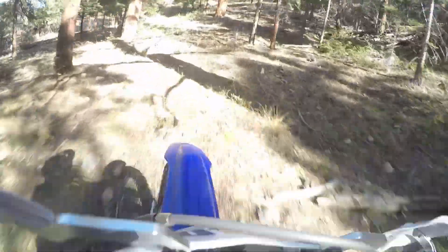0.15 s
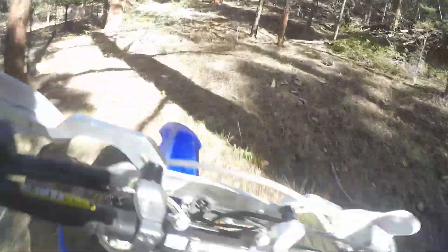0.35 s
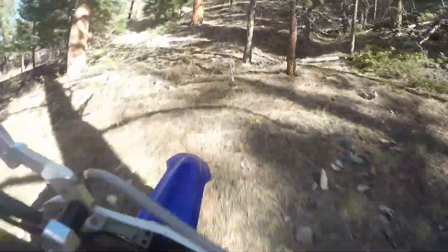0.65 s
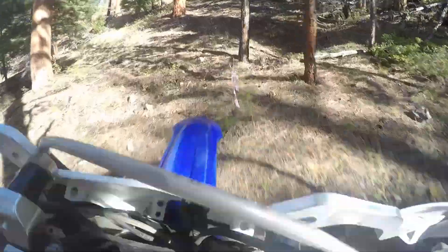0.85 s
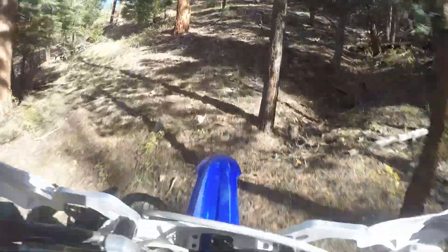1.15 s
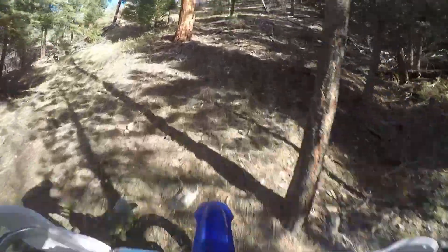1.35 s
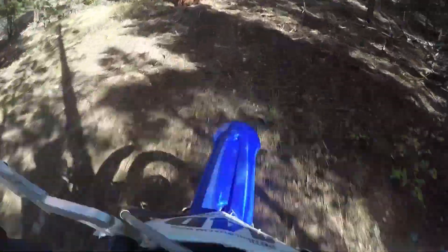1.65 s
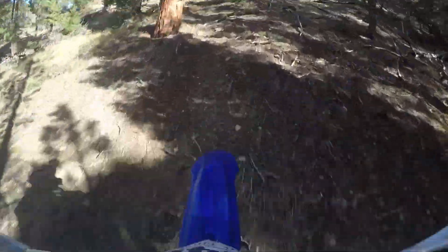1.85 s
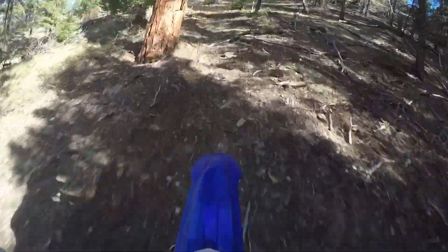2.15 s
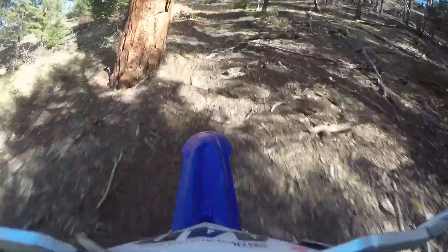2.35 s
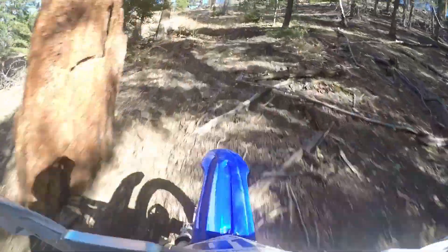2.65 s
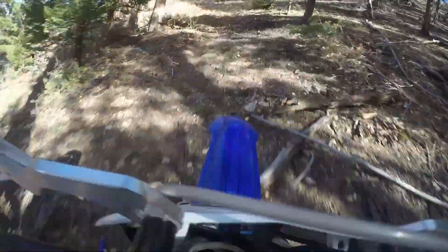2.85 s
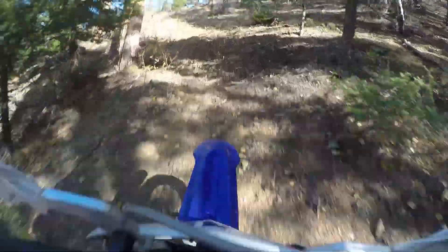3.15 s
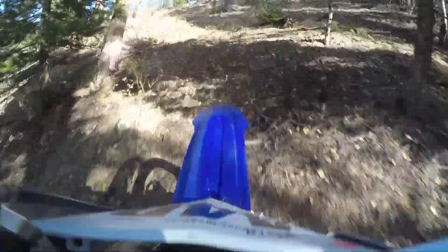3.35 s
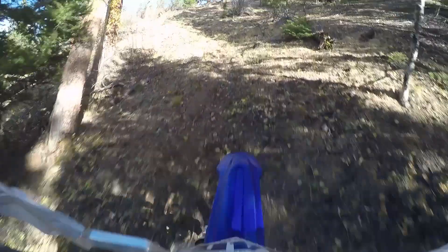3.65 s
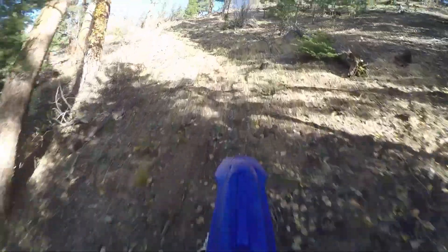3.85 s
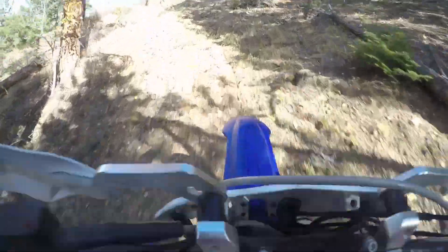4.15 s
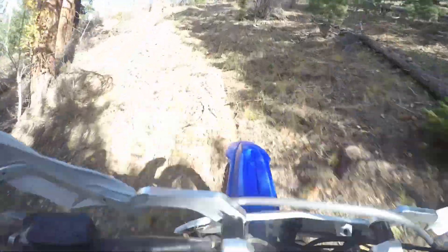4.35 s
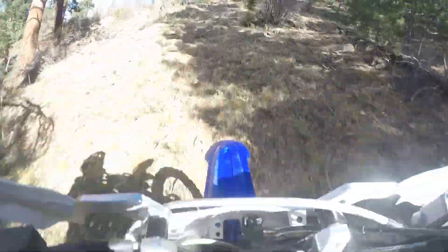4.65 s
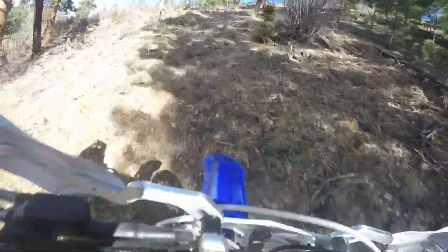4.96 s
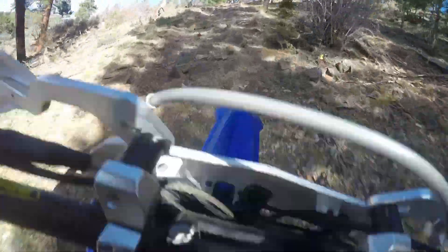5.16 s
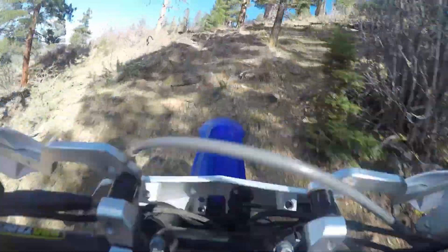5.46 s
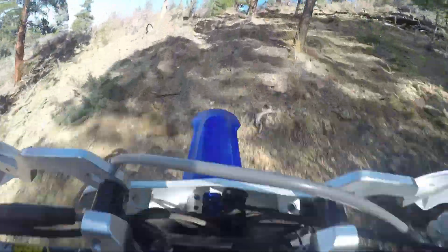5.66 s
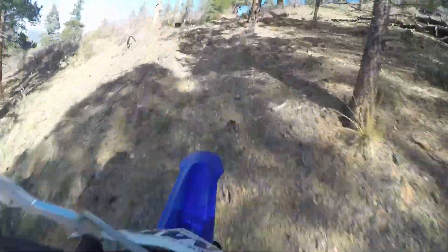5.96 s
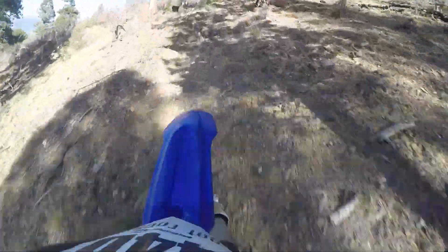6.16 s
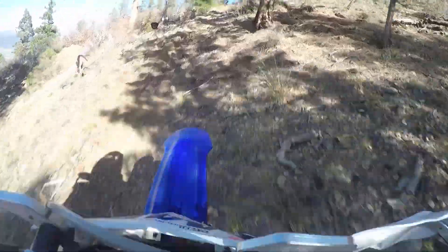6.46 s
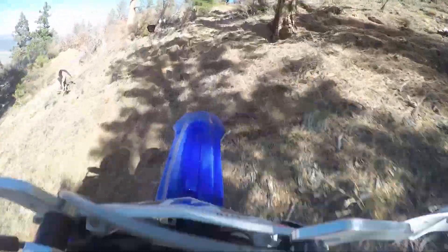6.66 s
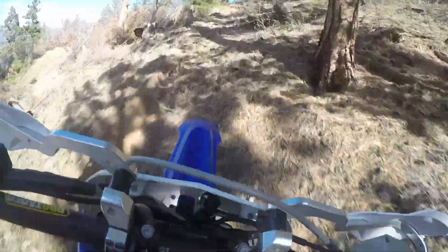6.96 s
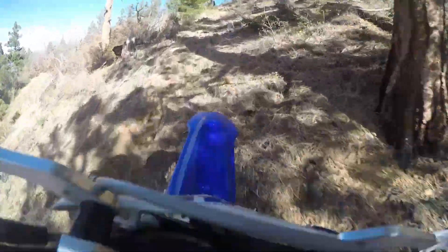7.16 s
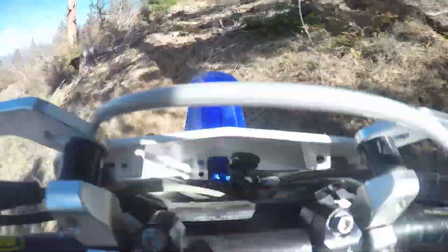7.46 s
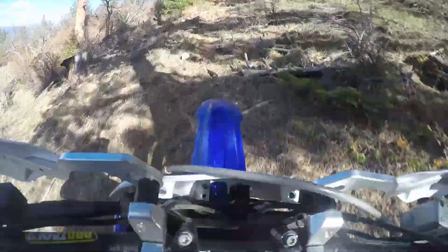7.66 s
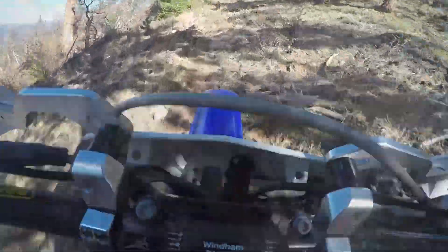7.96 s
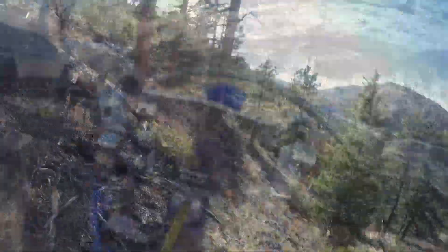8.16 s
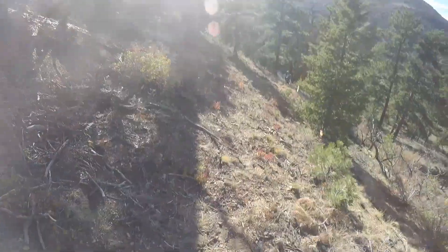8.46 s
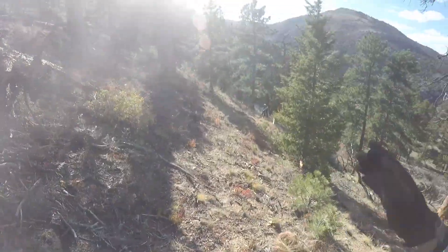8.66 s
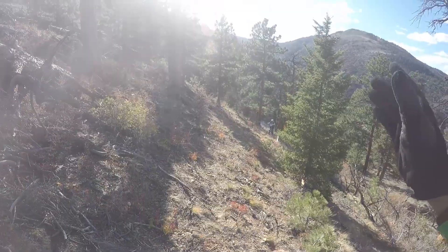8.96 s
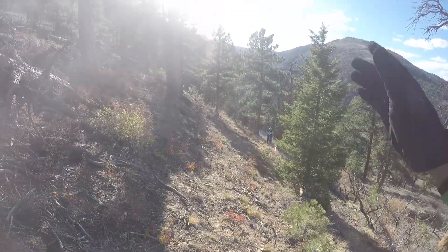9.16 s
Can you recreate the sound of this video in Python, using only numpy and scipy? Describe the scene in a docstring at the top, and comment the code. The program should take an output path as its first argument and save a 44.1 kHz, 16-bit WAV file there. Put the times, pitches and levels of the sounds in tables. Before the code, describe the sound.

A two-stroke dirt bike climbs a loose forest slope, heard from a microphone on the rider. The engine revs unevenly up and down with a rattling, hissy edge over low wind rumble and a few grit ticks. A stone strikes with one loud crack, and the engine pushes to its highest revs before easing. The ride fades into a soft breeze in the trees, with a dull thump, light clicks and a faint distant bike.

```python
"""Dirt bike on a forest slope

A two-stroke bike climbs loose ground, heard from a camera strapped to the rider. Each firing pushes
a low note out of the exhaust, shakes the panels and cylinder, and adds a puff of hiss. Wind rumbles,
grit ticks and a stone strikes. The ride fades out and a quiet hillside fades in, with knocks on the
camera housing, its swaying mount and a far bike coming nearer."""
import sys
import numpy as np
from scipy import signal
from scipy.fft import rfft, irfft, next_fast_len
from scipy.io import wavfile
from scipy.ndimage import uniform_filter1d

SR = 44100
rng = np.random.default_rng(int(sys.argv[2]) if len(sys.argv) > 2 else 0)


def dump(signal):
    """Clip the signal to [-1, 1] and save it as 16-bit WAV at the path in sys.argv[1]."""
    limited = np.clip(np.atleast_2d(signal).T, -1, 1)
    pcm = np.round(limited * 32767).astype(np.int16)
    wavfile.write(sys.argv[1], SR, pcm)


N = 410130
TIME = np.arange(N) / SR
HIT_TIME = TIME[:8000]  # the short clock of one knock or thump


def gain_of(db):
    """Turns decibels into a number to multiply a sound by."""
    return 10 ** (np.asarray(db) / 20)


def evened(x):
    """Scales a signal to an average size (rms) of 1."""
    return x / np.sqrt(np.mean(x ** 2) + 1e-20)


def curves(rows):
    """Joins a table's points into lines over time; adds a gate that is open from first row to last."""
    times, *columns = np.transpose(rows)
    gate = uniform_filter1d(1. * (TIME >= times[0]) * (TIME <= times[-1]), size=400)
    return [np.interp(TIME, times, column) for column in columns] + [gate]


def add(mix, start_s, sound):
    """Mixes a short sound in at its start time."""
    part = mix[round(start_s * SR):][:len(sound)]
    part += sound[:len(part)]


def coloured(x, points):
    """Makes some pitches louder and others softer, like a tone control."""
    pitches, db = np.transpose(points)
    size = next_fast_len(N)
    hz = np.fft.rfftfreq(size, 1 / SR)
    shape = gain_of(np.interp(np.log(hz + 1), np.log(pitches + 1), db))
    return evened(irfft(rfft(x, size) * shape, size)[:N])


def ringing(x, notes):
    """An object shaken by x rings at its own notes; narrower notes ring longer."""
    out = np.zeros(N)
    for k, (hz, width, db) in enumerate(notes):
        decay = np.exp(-np.pi * width / SR)
        pole = decay * np.exp(2j * np.pi * hz / SR)
        out += (-1) ** k * gain_of(db) * signal.lfilter([1 - decay], [1, -pole], x).real
    return evened(out)


def drift(rate_hz):
    """A smooth random wobble; a higher rate wobbles faster."""
    smooth = signal.butter(2, rate_hz, fs=SR, output="sos")
    return evened(signal.sosfilt(smooth, rng.standard_normal(N)))


# Exhaust loudness (time [s], level of harmonic 1 [dB], level of the rest together [dB])
EXHAUST_LEVELS = [(0.0, -13, -30.5), (0.08, -11, -32), (0.13, -14.5, -44), (0.19, -15, -38),
                  (0.26, -34, -33), (0.28, -20, -16.5), (0.43, -16, -17), (0.58, -14, -23.5),
                  (0.71, -16.5, -13), (1.45, -16, -12), (1.49, -24.5, -12), (1.69, -17, -17),
                  (1.83, -18, -11.5), (1.88, -28, -11.5), (1.99, -18, -13.5), (2.1, -19.5, -12.5),
                  (2.83, -17, -13), (2.98, -14, -22.5), (3.05, -16, -16.5), (3.2, -19, -14),
                  (3.67, -18, -17.5), (3.91, -34, -15.5), (3.98, -23, -13.5), (4.13, -15, -17),
                  (4.88, -21.5, -15.5), (4.95, -33, -15), (5.01, -13, -14), (5.1, -27, -14),
                  (5.3, -16, -18.5), (5.38, -17, -22), (5.62, -17, -13), (5.75, -14.5, -21.5),
                  (5.88, -12.5, -31.5), (5.92, -18, -35), (5.97, -17.5, -19.5), (6.16, -16, -16.5),
                  (6.35, -13.5, -28.5), (6.65, -13.5, -17), (6.68, -12.5, -24.5), (7.28, -12.5, -18),
                  (7.37, -15.5, -21.5), (7.5, -17.5, -14.5), (7.63, -15, -15.5), (7.76, -16.5, -13)]
# How the pipe favours harmonics 2 to 4 (pitch [Hz], level [dB])
PIPE_TONE = [(140, -21), (170, -13.5), (200, -8.5), (240, -2.5), (285, 2), (320, 2), (360, -9), (400, -19),
             (450, -16.5), (500, -17.5)]
# The same for harmonics 5 to 10 (pitch [Hz], level [dB])
UPPER_TONE = [(300, 4), (400, 1.5), (480, -1), (540, -8), (620, -17.5), (800, -24.5), (900, -35.5)]


def exhaust(firing_hz, turns):
    """The pipe's low note: ten harmonics, which are tones at 1, 2, 3... times the firing rate."""
    first_db, rest_db, _ = curves(EXHAUST_LEVELS)
    contrast = np.clip(2 + .44 * (rest_db + 16), .3, 1)  # the pipe's peak flattens when it is quiet
    shares_db = []
    for k, trim_db in [(2, 3), (3, .5), (4, 2)]:
        db = contrast * np.interp(k * firing_hz, *np.transpose(PIPE_TONE)) + trim_db
        waver_db = 5.5 * np.clip(-db / 10, 0, 1)  # harmonics off the pipe's peak come and go
        shares_db.append(db + waver_db * drift(rate_hz=6.2))
    shares_db += [np.interp(k * firing_hz, *np.transpose(UPPER_TONE)) - 12.5 for k in range(5, 11)]
    total_db = 10 * np.log10(sum(gain_of(db) ** 2 for db in shares_db))
    levels_db = [first_db] + [rest_db + db - total_db for db in shares_db]
    chamber_hz, width_hz = 400, 250  # the exhaust chamber delays harmonics near its own note
    out = np.zeros(N)
    for k, db in enumerate(levels_db, 1):
        lag = np.arctan2(k * firing_hz * width_hz, chamber_hz ** 2 - (k * firing_hz) ** 2)
        if k == 1:  # the frame carries the lowest tone late at low speed
            lag += np.clip((95 - firing_hz) / 24, 0, .7)
        out -= np.sqrt(2) * gain_of(db + 1.27 * drift(rate_hz=17)) * np.cos(2 * np.pi * k * turns - lag)
    return out


# Firing, port opening, reed valve closing and piston slap (place in the turn [0 to 1], level [dB])
BLOWS_PER_TURN = [(0, 0), (.19, -6), (.41, -5), (.70, -8)]


def engine_blows(turns):
    """Four clicks in each turn of the engine, a little uneven in time and strength."""
    out = np.zeros(N)
    for place, db in BLOWS_PER_TURN:
        strength, jitter = rng.standard_normal((1200, 2))[(turns - place + 1.5).astype(int)].T
        uneven_turns = turns - place + .002 * jitter + .012 * place * drift(rate_hz=4)
        clicks = np.diff(np.floor(uneven_turns), prepend=0).clip(0)
        out += clicks * gain_of(db + 1.5 * strength + 1.5 * drift(rate_hz=6))
    return evened(out)


# Notes of the body panels (pitch [Hz], width [Hz], level [dB])
PANEL_NOTES = [(620, 960, -14.5), (864, 155, -3), (961, 80, 3.5), (1067, 181, -2.5), (1248, 98, -4),
               (1405, 117, -2.5), (1614, 143, -3.5), (2110, 366, -7)]


def panel_rattle(blows, puffs, chatter):
    """Blows, puffs and loose parts shake the panels."""
    return ringing(1.3 * blows + puffs + .3 * chatter, PANEL_NOTES)


# Broad notes of the cylinder (pitch [Hz], width [Hz], level [dB])
CYLINDER_NOTES = [(2300, 230, -4.5), (2541, 110, -3.5), (2727, 64, 0), (2989, 254, 3), (3219, 233, -0.5),
                  (3485, 146, -4), (3716, 123, -5.5)]
# Sharp notes heard when the engine works hard (pitch [Hz], width [Hz], level [dB])
HARD_WORK_NOTES = [(1597, 30, -5), (2568, 28, -7), (3015, 24, 1), (3175, 20, -3), (3590, 30, -5)]
# Notes that sing out at top speed (pitch [Hz], width [Hz], level [dB])
TOP_SPEED_NOTES = [(3015, 16, 0), (3175, 16, -9), (1597, 24, -14)]


def cylinder_ring(blows, puffs, chatter, ring_db, firing_hz):
    """The struck cylinder rings, with sharper notes when the engine works hard or runs fast."""
    shaking = 1.5 * blows + puffs
    ring = ringing(shaking + .3 * chatter, CYLINDER_NOTES)
    work_db = .7 * np.minimum(ring_db + 21, 0) - 1.5
    ring += gain_of(work_db) * ringing(shaking, HARD_WORK_NOTES)
    sing_db = -25.5 - (120 - firing_hz).clip(0)  # 1 dB softer for each Hz below 120
    return gain_of(ring_db) * ring + gain_of(sing_db) * ringing(blows + puffs, TOP_SPEED_NOTES)


# Tone of the air being sucked in (pitch [Hz], level [dB])
INTAKE_TONE = [(2240, -31.5), (3800, 0), (4250, -5.5), (6090, -3.5), (6810, -8.5), (7430, -10), (8500, -20),
               (11000, -52.5), (18700, -120)]
# Notes of the cooling fins (pitch [Hz], width [Hz], level [dB])
FIN_NOTES = [(4790, 60, 0), (5450, 60, -1), (5920, 30, 2), (6720, 45, -6), (7160, 40, -3)]


def intake_hiss(blows, puffs, chatter):
    """Air hisses into the engine in puffs while the fins ring faintly."""
    intake = puffs + .32 * chatter
    return evened(coloured(intake, INTAKE_TONE) + .32 * ringing(intake + blows, FIN_NOTES))


# Tone of the highest hiss (pitch [Hz], level [dB])
FIZZ_TONE = [(4710, -38.5), (8000, -3.5), (9150, -11), (10400, -2), (12500, -8), (14700, -17.5),
             (15400, -20)]


def fizz(puffs, chatter):
    """Puffs and loose parts add a thin, flickering sizzle."""
    return gain_of(.5 * drift(rate_hz=11)) * coloured(puffs + .26 * chatter, FIZZ_TONE)


# Engine speed, one firing per turn (time [s], firing rate [Hz])
ENGINE_SPEED = [(0, 103.1), (.09, 99.5), (.16, 96.6), (.27, 70.5), (.39, 71.8), (.48, 78.4), (.61, 84.56),
                (.68, 77.2), (.75, 84.3), (.89, 73.25), (1.07, 71.1), (1.11, 75.4), (1.16, 70.8),
                (1.23, 72.56), (1.31, 82), (1.37, 83), (1.43, 95.7), (1.52, 88.1), (1.57, 96.7), (1.66, 72),
                (1.73, 75.3), (1.77, 71.4), (1.84, 87.9), (1.91, 84.8), (1.98, 94.65), (2.18, 99.1),
                (2.25, 96.6), (2.52, 92.85), (2.66, 103.9), (2.89, 105.6), (2.98, 95.9), (3.05, 93.8),
                (3.14, 92.26), (3.22, 104.6), (3.3, 96.3), (3.39, 98), (3.48, 90.5), (3.57, 94.4),
                (3.71, 109.7), (3.93, 114.9), (4.07, 108.7), (4.12, 102.9), (4.23, 104.1), (4.32, 107.3),
                (4.43, 114.9), (4.64, 110.2), (4.71, 113.9), (4.8, 112.4), (4.87, 124), (4.92, 116.8),
                (5.03, 121.9), (5.16, 120.2), (5.28, 105.8), (5.35, 91.1), (5.48, 89.6), (5.53, 97.3),
                (5.6, 93.1), (5.69, 102.3), (5.8, 105.4), (5.94, 87.75), (5.98, 94.5), (6.08, 92.85),
                (6.19, 98.05), (6.39, 90.4), (6.46, 93.3), (6.51, 88.2), (6.58, 94.64), (6.85, 84.9),
                (7.03, 86.7), (7.08, 90.42), (7.12, 85.4), (7.19, 91.45), (7.23, 88.5), (7.33, 92.8),
                (7.51, 79.5), (7.6, 77.1), (7.85, 93.8), (8.15, 90.3)]
# Two lists, before and after the stone strike (time [s], mids level [dB], treble level [dB])
MIDS_AND_TREBLE = [
    [(0.03, -27, -34), (0.19, -30, -39.5), (0.24, -34, -45), (0.67, -23, -35), (1.04, -26, -38.5),
     (1.56, -26, -35), (1.6, -22, -36), (1.66, -29.5, -43), (1.85, -22, -35), (1.91, -24.5, -39),
     (2.1, -24.5, -34), (2.16, -26.5, -37), (2.2, -22, -28.5), (2.23, -25, -33.5), (2.53, -25, -36.5),
     (2.73, -24.5, -31.5), (2.76, -23.5, -31), (2.88, -24, -28.5), (3.03, -25, -35), (3.4, -23.5, -33.5)],
    [(3.48, -29, -44), (3.66, -30.5, -40), (4.0, -24.5, -26), (4.3, -25, -28), (4.33, -22.5, -31),
     (4.58, -23, -27.5), (5.29, -25, -28), (5.45, -24, -31.5), (5.49, -25.5, -39.5), (5.86, -25.5, -30.5),
     (5.88, -29.5, -35.5), (6.13, -23, -34.5), (6.28, -29, -32), (6.65, -22.5, -32.5), (6.73, -22.5, -35),
     (7.14, -22, -33), (7.16, -21.5, -29.5), (7.6, -22, -38), (7.62, -20, -35.5), (7.76, -22, -33)],
]
# How ring, hiss and fizz follow the treble
# (level at usual treble [dB], rise per dB of treble [dB], boost at full throttle [dB])
TREBLE_LAYERS = [(-27, 0.67, 0.5), (-33.5, 1.06, 0.5), (-50, 1.0, 7)]
USUAL_TREBLE_DB, FULL_THROTTLE_S, OPENING_S = -34, (3.78, 5.47), .04


def engine():
    """The turning engine drives the exhaust note and the blows and puffs behind its rattle and hiss."""
    firing_hz, _ = curves(ENGINE_SPEED)
    mids_db, treble_db, _ = curves(np.vstack(MIDS_AND_TREBLE))
    opens_s, closes_s = FULL_THROTTLE_S
    full_throttle = np.clip(np.minimum(TIME - opens_s, closes_s - TIME) / OPENING_S, 0, 1)
    ring_db, hiss_db, fizz_db = [db + rise * (treble_db - USUAL_TREBLE_DB) + boost_db * full_throttle
                                 for db, rise, boost_db in TREBLE_LAYERS]
    turns = np.cumsum(firing_hz * (1 + .006 * drift(rate_hz=14))) / SR
    low_note = exhaust(firing_hz, turns)
    strength = gain_of(2.5 * rng.standard_normal(1200))[turns.astype(int)]  # each firing differs
    blows = engine_blows(turns)
    pulse = strength * np.exp(-((turns + .4) % 1) / .5)
    panel_puffs, ring_puffs, hiss_puffs, fizz_puffs = [
        evened((steady + pulse) * rng.standard_normal(N)) for steady in (.52, .94, 1, .97)]
    click_sizes = gain_of(2.3 * rng.exponential(1, N).clip(0, 5))
    chatter = evened(click_sizes * (rng.random(N) < 900 / SR))  # loose parts, about 900 clicks a second
    bumps = gain_of(.9 * drift(rate_hz=14.3))  # rough ground shakes all four layers at once
    layers = gain_of(mids_db - .07) * panel_rattle(blows, panel_puffs, chatter)
    layers += cylinder_ring(blows, ring_puffs, chatter, ring_db, firing_hz)
    layers += gain_of(hiss_db) * intake_hiss(blows, hiss_puffs, chatter)
    layers += gain_of(fizz_db) * fizz(fizz_puffs, chatter)
    return low_note + bumps * layers


# Wind loudness (time [s], level [dB])
WIND_LEVELS = [(0, -21), (.8, -24), (2.4, -25), (3.7, -27), (4.7, -25.5), (5.4, -20), (6.5, -23),
               (7.6, -23)]
# Wind tone (pitch [Hz], level [dB])
WIND_TONE = [(10, -1), (30, -1.5), (60, -5), (140, -8), (250, -14.5), (450, -15.5), (900, -31), (2000, -49)]


def wind():
    """Air rushing over the microphone opening makes a lumpy rumble."""
    db, _ = curves(WIND_LEVELS)
    return gain_of(db + 2.36 * drift(rate_hz=8)) * coloured(rng.standard_normal(N), WIND_TONE)


# Ticks on the housing: grains of grit, and the bright crack that starts some knocks and the stone strike (time
# [s], relative level [dB])
HOUSING_TICKS = [(0.0995, -12), (0.1291, -30), (0.1554, -30), (0.6406, -18), (0.743, -16.5), (1.834, -23),
                 (3.4462, -10), (3.455, -18), (5.9964, -24), (6.4399, -31), (7.1619, -39.5), (8.517, -47),
                 (8.6527, -42), (8.7444, -43), (8.754, -20.5), (8.7755, -34), (8.8732, -45), (8.9137, -37),
                 (8.9406, -48)]


def bright_ticks(decay_s=.0022):
    """Each tick is a tiny burst of bright noise."""
    out = np.zeros(N)
    bright = signal.butter(2, [4500, 13500], "bandpass", fs=SR, output="sos")
    for start_s, db in HOUSING_TICKS:
        noise = evened(signal.sosfilt(bright, rng.standard_normal(500)))
        add(out, start_s, gain_of(db) / 2 * noise * np.exp(-TIME[:500] / decay_s))
    return out


# Dull bumps on the housing (time [s], level [dB], pitch [Hz], time to fade by 60 dB [s])
HOUSING_THUMPS = [(2.5, -5, 300, 0.027), (8.484, -4.5, 71, 0.16), (8.482, -9, 143, 0.075),
                  (8.475, -26, 41, 0.33), (8.49, -23.5, 218, 0.13), (8.572, -25, 95, 0.23),
                  (8.92, -32.5, 155, 0.098)]


def thumps():
    """Each bump is one low tone that starts fast and dies away."""
    out = np.zeros(N)
    onset = 1 - np.exp(-HIT_TIME / .0028)
    for start_s, db, hz, fade_s in HOUSING_THUMPS:
        loudness = onset * gain_of(db - 60 * HIT_TIME / fade_s)
        add(out, start_s, -loudness * np.sin(2 * np.pi * hz * HIT_TIME))
    return out


# The stone strike, then the hillside knocks (time [s], peak level [dB], favoured pitch [Hz])
HOUSING_KNOCKS = [(3.4465, 8.5, 1900), (3.4545, -6, 2300), (8.259, -48, 2020), (8.4832, -25, 1007),
                  (8.653, -37, 2800), (8.71, -44, 3300), (8.754, -24, 3270), (8.776, -31, 3300),
                  (8.825, -42, 1000), (8.843, -34, 900)]
# Notes of the housing (pitch [Hz], level [dB], time to fade by 60 dB [s])
HOUSING_NOTES = [(620, -3, .018), (850, -3, .012), (1100, -1, .016), (1400, -5, .012), (1730, -5, .014),
                 (2110, -4, .012), (2430, -1, .024), (2890, -4, .012), (3350, -2, .02), (4100, -9, .01),
                 (4800, -10, .01), (5600, -10, .01), (6300, -9, .01)]


def knocks():
    """A knock rings the housing, mostly at the notes near its favoured pitch."""
    out = np.zeros(N)
    # the spot that is struck decides which way each note swings first
    spots = rng.choice([-1., 1.], (len(HOUSING_KNOCKS), len(HOUSING_NOTES)))
    for (start_s, peak_db, favoured_hz), spot in zip(HOUSING_KNOCKS, spots):
        knock = np.zeros(len(HIT_TIME))
        for sign, (hz, db, fade_s) in zip(spot, HOUSING_NOTES):
            start_db = db - 6 * np.log2(hz / favoured_hz) ** 2
            knock += sign * gain_of(start_db - 60 * HIT_TIME / fade_s) * np.sin(2 * np.pi * hz * HIT_TIME)
        knock *= 1 - np.exp(-HIT_TIME * favoured_hz / .4)  # higher knocks start more sharply
        add(out, start_s, gain_of(peak_db) * knock / abs(knock).max())
    return out


# Loudness of the hillside hush (time [s], level [dB])
HUSH_LEVELS = [(8.17, -58), (8.338, -53), (8.43, -43.5), (8.72, -38.5), (9.116, -42), (9.3, -39)]
# Tone of the trees (pitch [Hz], level [dB])
HUSH_TONE = [(35, -35), (60, 4), (132, -13.5), (167, -21.5), (205, -24), (247, -18.5), (291, -35),
             (319, -21), (376, -30), (671, -36.5), (2580, -31.5), (4100, -39.5), (4610, -45), (5950, -46),
             (15400, -60)]
# Notes of the air inside the housing (pitch [Hz], width [Hz], level [dB])
HOLLOW_NOTES = [(1500, 150, -5), (2200, 120, -2), (2570, 100, 0), (3380, 110, 0), (4600, 200, -6)]


def tree_hush():
    """A soft breeze in the trees, which also rings faintly in the hollow housing."""
    db, gate = curves(HUSH_LEVELS)
    breeze = rng.standard_normal(N)
    hush = coloured(breeze, HUSH_TONE) + .085 * ringing(breeze, HOLLOW_NOTES)
    return gate * gain_of(db + 1.7 * drift(rate_hz=24)) * hush


# Nudges to the camera mount (time of widest swing [s], hold [s], pitch [Hz], level [dB])
MOUNT_SWINGS = [(8.29, .02, 37.6, -28.5), (8.37, 0.011, 37.8, -34), (8.55, .01, 42.3, -27),
                (8.65, 0.017, 39.5, -28), (8.78, 0.17, 39, -21.5), (9.18, 0.015, 32, -32)]


def mount_sway(rise_db_per_s=296, fall_db_per_s=248):
    """Each nudge builds a deep swing of the mount, which holds and then dies away."""
    times, _, hz, _ = np.transpose(MOUNT_SWINGS)
    swings_db = [db - rise_db_per_s * (at - TIME).clip(0) - fall_db_per_s * (TIME - at - hold).clip(0)
                 for at, hold, _, db in MOUNT_SWINGS]
    pitch_hz = np.interp(TIME, times, hz) * (1 + .069 * drift(rate_hz=18.3))
    cycles = np.cumsum(pitch_hz) / SR
    return gain_of(np.max(swings_db, axis=0)) * np.sqrt(2) * np.sin(2 * np.pi * cycles)


# The far bike coming nearer (time [s], firing rate [Hz], level [dB])
FAR_RIDE = [(8.5, 88.4, -69), (8.8, 93.6, -67), (8.95, 86.5, -71), (9.03, 79.3, -57), (9.1, 80.6, -56),
            (9.2, 87.8, -58), (9.3, 91, -53)]
# Its harmonics (multiple of the firing rate, level [dB])
FAR_HARMONICS = [(1, 2), (2, 3), (3, 5), (4, -3.5), (5, -13), (6, -18)]


def far_bike():
    """A distant engine, heard only as the hum of its low harmonics."""
    firing_hz, db, gate = curves(FAR_RIDE)
    turns = np.cumsum(firing_hz) / SR
    hum = sum(gain_of(level) * np.cos(2 * np.pi * k * turns) for k, level in FAR_HARMONICS)
    return gate * gain_of(db) * hum


def scene():
    """The ride fades into the hillside; hits on the housing sound in both."""
    fade_out = np.interp(TIME, [7.62, 8.15], [1, 0])
    ride = fade_out * (engine() + wind())
    housing = bright_ticks() + thumps() + knocks()
    hillside = tree_hush() + mount_sway() + far_bike()
    return (ride + housing + hillside)[None]


def record(dry):
    """Flattens the loudest peaks, then removes the treble above 15400 Hz."""
    clipped = np.clip(dry, -.97, .97)
    treble_cut = signal.firwin(511, 15400, window=("kaiser", 9), fs=SR)
    return signal.oaconvolve(clipped, treble_cut[None], "same")


dry = scene()
out = record(dry)
dump(out)
```